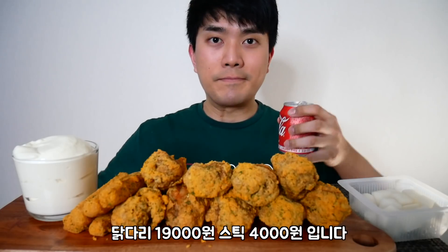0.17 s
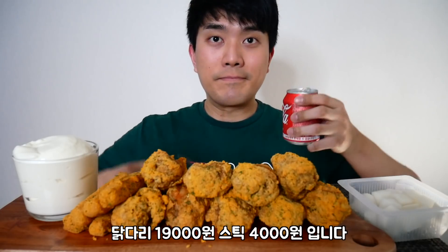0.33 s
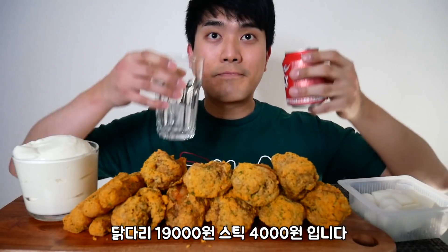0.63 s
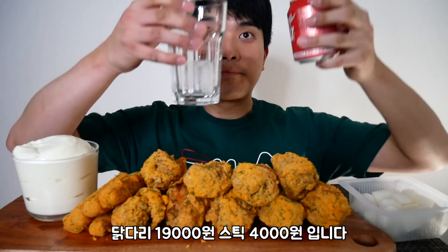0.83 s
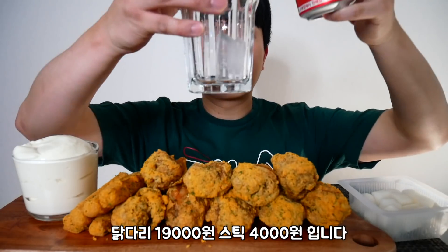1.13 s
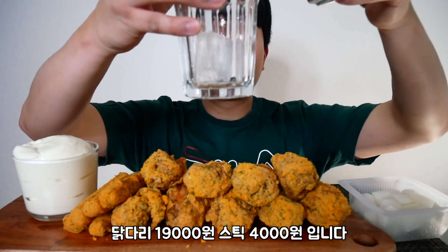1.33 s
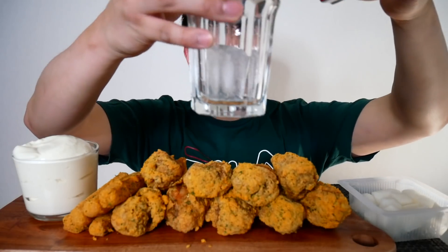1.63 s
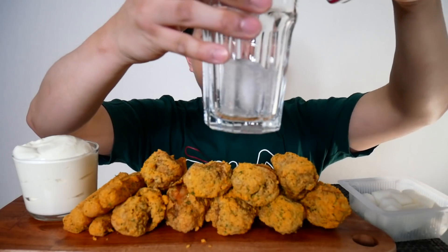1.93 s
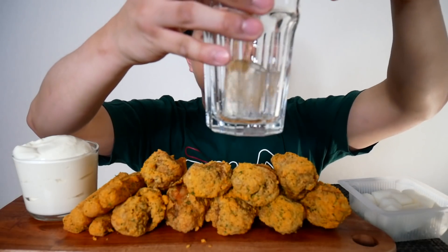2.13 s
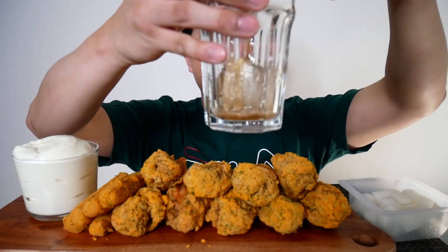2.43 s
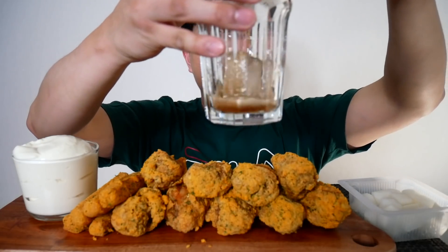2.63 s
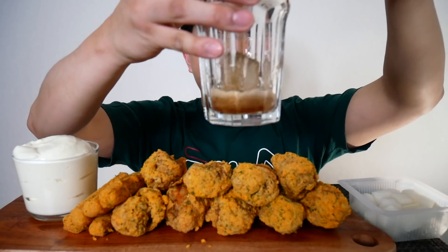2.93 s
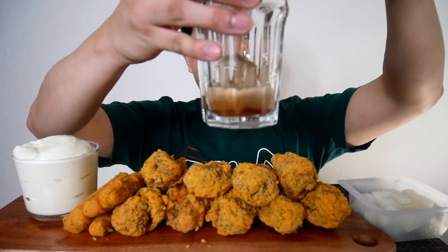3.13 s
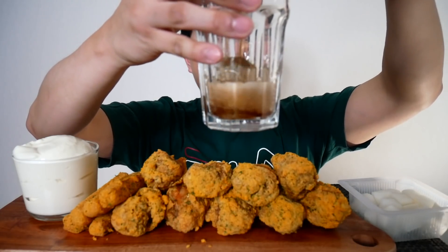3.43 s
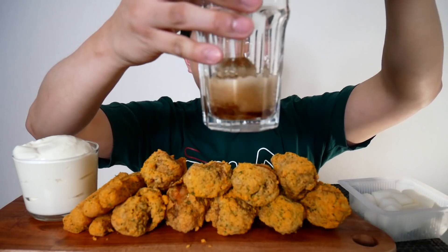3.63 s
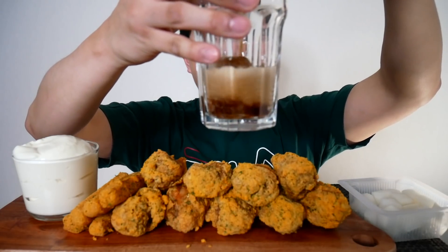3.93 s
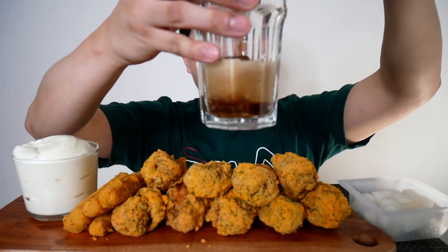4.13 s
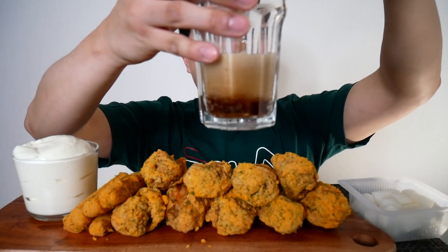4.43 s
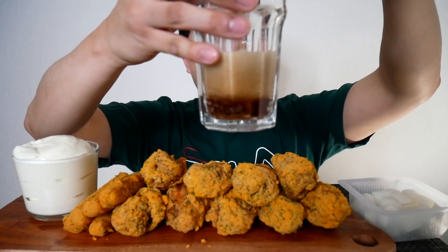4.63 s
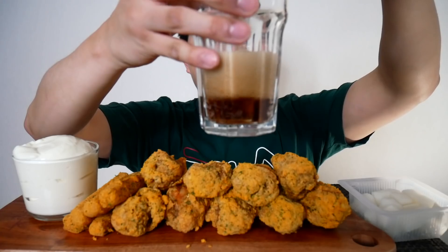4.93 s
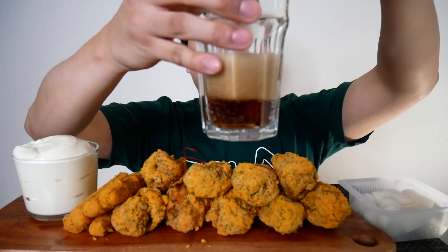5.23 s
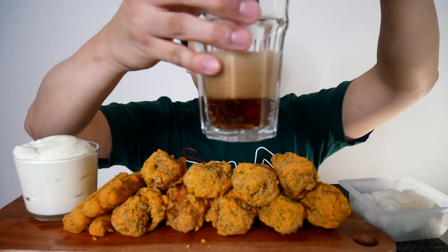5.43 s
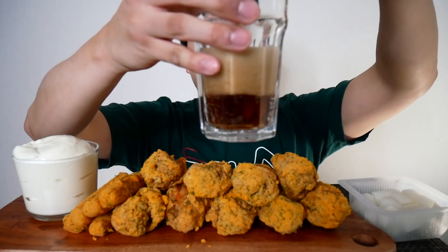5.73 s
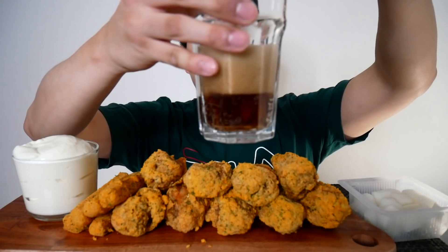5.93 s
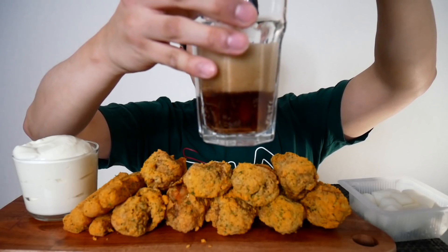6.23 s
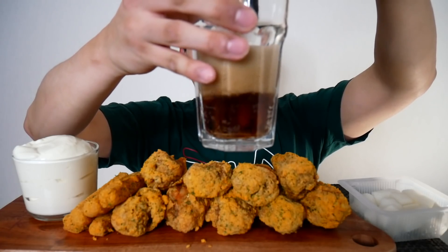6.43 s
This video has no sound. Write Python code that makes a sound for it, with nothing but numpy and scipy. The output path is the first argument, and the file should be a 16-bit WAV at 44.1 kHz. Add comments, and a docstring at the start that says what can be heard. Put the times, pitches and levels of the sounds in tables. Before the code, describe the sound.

Close, dry view of a soft drink poured over ice: faint tinks, sudden bright ice cracks, crackling fizz, then thick hollow bubbling as the glass fills.

```python
"""Soda poured over ice

In a quiet room, ice cubes clink faintly in a tall glass, a sleeve brushes past and a can wall gives.
Soda is then poured over the ice: fizz and splash are shaped noise, cracks are bright splinters of noise,
bubbles pop as short sines in the air column, whose pitch mostly climbs as the glass fills, and air pockets
gurgle as rising sines. Knocks also make the filled glass hum, and a short room echo follows the hits."""
import sys
import numpy as np
from scipy import signal
from scipy.fft import rfft, irfft, next_fast_len
from scipy.io import wavfile

SR = 44100
rng = np.random.default_rng(int(sys.argv[2]) if len(sys.argv) > 2 else 0)


def int16_out(signal):
    """Quantize to a 16-bit WAV file."""
    q = np.round(np.clip(np.atleast_2d(signal).T, -1, 1) * 32767)
    wavfile.write(sys.argv[1], SR, q.astype(np.int16))


N = 290178   # length [samples]
POUR_START_S = 2.085
BUBBLING_MEAN_DB = -46   # middle level from which the bubbling swings


def amp(db):
    """Decibels to gain."""
    return 10 ** (np.asarray(db) / 20)


def unit(x):
    """Scale to rms 1."""
    return x / np.sqrt(np.mean(x ** 2) + 1e-20)


def in_time(rows):
    """Read a (time, value) table as a curve with one value per sample."""
    s, value = np.transpose(rows)
    return np.interp(np.arange(N) / SR, s, value)


def drift(rate_hz):
    """Slow random wandering of spread 1: smoothed noise, made at every 40th sample."""
    r = np.exp(-80 * np.pi * rate_hz / SR)
    noise = rng.standard_normal(N // 40 + 2002)
    slow = signal.lfilter([1], [1, -2 * r, r * r], noise)[2000:]   # skip the filter's start
    return np.interp(np.arange(N) / 40, np.arange(len(slow)), unit(slow))


def ring(clicks, hz, t60):
    """A resonance: a unit click starts a sine of height 1 that falls by 60 dB in t60 seconds."""
    r, w = amp(-60 / (t60 * SR)), 2 * np.pi * hz / SR
    return signal.lfilter([0, np.sin(w)], [1, -2 * r * np.cos(w), r * r], clicks + 1e-18)


def train(times, gains):
    """Clicks of the given sizes at the given times."""
    out = np.zeros(N)
    np.add.at(out, np.round(np.asarray(times) * SR).astype(int), gains)
    return out


def add(out, s, piece):
    """Mix a short sound in at time s."""
    i = round(s * SR)
    out[i:i + len(piece)] += piece[:N - i]


def band(x, low_hz, high_hz):
    """Butterworth band-pass."""
    edges = [low_hz, min(high_hz, .45 * SR)]
    return signal.sosfilt(signal.butter(2, edges, "band", fs=SR, output="sos"), x)


def coloured(source, spectrum, patchy_db, flicker_hz):
    """Third-octave bands of two sources in turn, each with its own level and flicker; rms 1."""
    hz, level_db = np.transpose(spectrum)
    edges = hz[0] * 2 ** np.arange(0, np.log2(hz[-1] / hz[0]) + 1 / 3, 1 / 3)
    out, together = 0, drift(flicker_hz / 4)   # a slower flicker shared by all bands
    for k, (low, high) in enumerate(zip(edges, edges[1:])):
        mean_db = np.interp(np.log(low * high) / 2, np.log(hz), level_db)
        flicker_db = patchy_db * (.8 * together + drift(flicker_hz))
        out = out + band(source[k % 2], low, high) * amp(mean_db + flicker_db)
    return unit(out)


def grains(per_s, spread_db):
    """Random clicks of very uneven size, two unrelated rows; rms 1."""
    sizes = amp(spread_db * np.minimum(rng.exponential(1, (2, N)), 5)) * rng.choice([-1, 1], (2, N))
    return unit(sizes * (rng.random((2, N)) < per_s / SR))


# bubbling in the glass, as level of the air column: (time [s], level [dB])
BUBBLING = [(2.12, -88), (2.18, -48.5), (2.37, -67), (2.52, -56.5), (2.75, -59), (2.9, -58), (3.06, -58),
            (3.2, -57.5), (3.42, -64), (3.46, -51.5), (3.85, -47), (4.14, -37.5), (4.35, -42), (4.6, -47),
            (4.95, -43.5), (5.12, -35), (5.39, -40), (5.53, -41.5), (6.58, -43.5)]


def small_events(count):
    """Random moments through the pour, with the bubbling level at each and two chance values."""
    when = rng.random(count)
    loud, tune = rng.standard_normal((2, count))
    s = POUR_START_S + when * (N / SR - POUR_START_S - 1 / SR)
    return s, np.interp(s, *np.transpose(BUBBLING)), loud, tune


# colour of the room tone: (pitch [Hz], relative level [dB per Hz])
HUSH = [(13, -47), (22, 9), (60, 6), (170, 5.5), (590, -4.5), (757, 1.5), (1080, -4.5), (1740, 4),
        (2110, -22), (2350, -4.5), (8870, -7), (15000, -13.5), (16300, -28)]
# loudness of the room tone: (time [s], level [dB])
HUSH_LEVEL = [(0.0, -69), (0.38, -70.5), (0.69, -69.5), (1.87, -73.5), (2.03, -73), (2.1, -71)]


def room_tone():
    """The quiet room: coloured noise that flickers slightly."""
    hush = coloured(rng.standard_normal((2, N)), HUSH, patchy_db=.5, flicker_hz=6)
    return amp(in_time(HUSH_LEVEL)) * hush


# cubes touch the dry glass: (time [s], touch level [dB], air column level [dB],
# pitch that the wall rings nearest to [Hz], tink level of the top modes [dB])
CLINKS = [(0.089, -43.5, -63, 2010, -79), (0.224, -37, -61, 1690, -63), (0.334, -50, -87, 2000, -83),
          (0.725, -52, -88, 1750, -75), (0.836, -39.5, -58, 1660, -74), (0.867, -38, -54.5, 1710, -67),
          (1.145, -39, -45.5, 2960, -85), (1.153, -35.5, -49, 1730, -82), (1.364, -29.5, -53.5, 3140, -63),
          (1.638, -31, -47.5, 2320, -84), (1.847, -46, -71, 1800, -82), (1.929, -41.5, -52, 2900, -63),
          (2.011, -40.5, -67, 1750, -71)]
# modes of the glass: (pitch [Hz], relative level [dB], t60 [s],
# group: 0 air column, 1-4 wall modes from low to high)
GLASS = [(690, 0, .03, 0), (800, 2, .09, 0), (1563, -3, .05, 1), (1700, -2, .04, 1), (1803, 0, .07, 1),
         (1870, 0, .06, 1), (2363, 5, .07, 2), (2912, 5, .07, 3), (3230, -2, .04, 3), (5100, 0, .03, 4),
         (5950, 6, .04, 4)]
RATTLE_DB, WALL_DB = -10, -18.5   # relative to the touch level
WALL_FALL_DB_PER_OCTAVE = 24   # wall modes ring less away from the touch's pitch


def clinks():
    """Each touch is a dull rattle of ice and strikes the air column and the wall modes near its pitch."""
    s, touch_db, column_db, pitch, tink_db = np.transpose(CLINKS)
    touches = train(s, amp(touch_db + RATTLE_DB))
    dying = signal.lfilter([1], [1, -np.exp(-1 / (0.012 * SR))], touches)   # fades over 12 ms
    out = band(dying * rng.standard_normal(N), low_hz=650, high_hz=2830)
    for hz, level_db, t60, group in GLASS:
        wall_db = touch_db + WALL_DB - WALL_FALL_DB_PER_OCTAVE * np.abs(np.log2(pitch / hz))
        strike_db = [column_db, wall_db, wall_db, wall_db, tink_db][group]
        chance_db = rng.normal(0, 2, len(s))
        out += ring(train(s, amp(strike_db + level_db + chance_db)), hz, t60)
    return out


# a sleeve brushes past: (time [s], level [dB])
RUSTLE = [(.4, -84), (.5, -79), (.8, -86), (.95, -67.5), (1.05, -86), (1.45, -74), (1.7, -78.5)]


def rustle():
    """Brushing cloth: low-pitched noise with a fast, slight flutter."""
    noise = unit(band(rng.standard_normal(N), low_hz=262, high_hz=520))
    return amp(in_time(RUSTLE) + 0.96 * drift(26)) * noise


# the can wall gives under the fingers: (time [s], level before the modes' own levels [dB])
CAN_FLEX = [(0.522, -43)]
# modes of the can wall: (pitch [Hz], relative level [dB], t60 [s])
CAN = [(1100, -30, .05), (1235, -2, 0.15), (1290, 8, 0.16), (1346, 3, 0.19), (1610, 0, 0.089),
       (1810, -6, .07), (2630, -8, 0.1)]


def can():
    """A click sets the modes of the thin wall ringing briefly."""
    s, flex_db = np.transpose(CAN_FLEX)
    return sum(ring(train(s, amp(flex_db + level_db - 14.0)), hz, t60) for hz, level_db, t60 in CAN)


# colour of the fizz: (pitch [Hz], relative level [dB per Hz])
FIZZ = [(1000, -10), (1700, -4.5), (2320, 0.5), (2730, 3), (3110, 2), (5240, 3), (7360, 2.5), (10400, -1.5),
        (15100, -11), (16300, -7.5)]
# glass resonances in the fizz: (pitch [Hz], width [Hz], lift [dB])
FIZZ_PEAKS = [(3050, 130, 6), (3550, 300, 3), (4620, 150, 4), (6800, 2500, 2)]
# first drops, then foam building up: (time [s], level [dB])
FIZZ_LEVEL = [(2.085, -48.5), (2.122, -70), (2.128, -51), (2.3, -46.5), (2.5, -39), (2.64, -39.5),
              (2.76, -41.5), (3.3, -40), (3.5, -39.5), (4.1, -36.5), (4.35, -38.5), (6.58, -38)]
THIN_FIZZ_HZ, THIN_FIZZ_DB = 5500, -8.5   # the first fizz is thin below this pitch
FIZZ_FULL_S = 2.63   # the foam has formed


def fizz():
    """Countless tiny bubbles hiss: coloured noise and clicks, plus single bubbles bursting."""
    level_db = in_time(FIZZ_LEVEL)
    source = rng.standard_normal((2, N)) + .5 * grains(4000, spread_db=3)
    hiss = coloured(source, FIZZ, patchy_db=.7, flicker_hz=16)
    for hz, width_hz, lift_db in FIZZ_PEAKS:
        peak = signal.lfilter(*signal.iirpeak(hz, hz / width_hz, fs=SR), hiss)
        hiss = hiss + (amp(lift_db) - 1) * peak
    hiss = unit(hiss)
    full = amp(THIN_FIZZ_DB * np.clip((FIZZ_FULL_S - np.arange(N) / SR) / 0.07, 0, 1))
    hiss = full * hiss + (1 - full) * band(hiss, THIN_FIZZ_HZ, high_hz=18900)
    return amp(level_db) * hiss + amp(level_db - 9) * crackle(300)


def crackle(per_s):
    """Small foam bubbles burst singly, each ringing briefly at one of 14 high pitches; rms 1."""
    clicks, dealt = grains(per_s, spread_db=3)[0], rng.integers(0, 14, N)
    pitches = np.geomspace(3000, 13000, num=14)
    rings = sum(ring(clicks * (dealt == k), hz, 33.0 / hz) for k, hz in enumerate(pitches))
    return unit(band(rings, low_hz=2500, high_hz=15600))


SPLASH_DB, SPLASH_SHARE = -60, 0.59   # level at mean bubbling as the pour starts; share of the swing
SPLASH_GROWS_DB_PER_S = 3.5


def splash(poured_s, swing_db):
    """The stream splashes: noise and very uneven clicks in a middle band, growing through the pour."""
    level_db = SPLASH_DB + SPLASH_SHARE * swing_db + SPLASH_GROWS_DB_PER_S * poured_s
    source = rng.standard_normal(N) + 0.59 * grains(900, spread_db=11.0)[0]
    return amp(level_db) * unit(band(source, low_hz=980, high_hz=2500))


# pitch of the air column as the glass fills: (time [s], pitch [Hz])
COLUMN_PITCH = [(2.1, 730), (3.0, 796), (4.3, 840), (5.1, 980), (6.58, 953)]


def drumming():
    """Middling bubbles drum the air column: uneven clicks and noise through two resonances."""
    source = grains(400, spread_db=6.0)[0] + 0.63 * rng.standard_normal(N)
    hz = in_time(COLUMN_PITCH)
    column = air_column(air_column(source, hz, width_hz=200), hz, width_hz=600)
    return amp(in_time(BUBBLING)) * column


def air_column(source, hz, width_hz):
    """A resonance that follows the given pitch, stepped in short blocks; rms 1."""
    out, state, r = np.zeros(N), np.zeros(2), np.exp(-np.pi * width_hz / SR)
    for i in range(0, N, 256):
        a = [1, -2 * r * np.cos(2 * np.pi * hz[i] / SR), r * r]
        out[i:i + 256], state = signal.lfilter([1, 0, -1], a, source[i:i + 256], zi=state)
    return unit(out)


# colour of the gurgle: (pitch [Hz], relative level [dB per Hz])
GURGLE = [(15, -59), (25, -50), (49, -2.5), (102, -3.5), (198, 3), (261, -9), (339, 4), (389, -30),
          (500, 12), (650, -30.5), (1100, -120)]
GURGLE_DB, GURGLE_SHARE = -57.5, 0.12   # level at mean bubbling; share of the swing


def gurgle(poured_s, swing_db):
    """The stream gurgles low down: flickering coloured noise that fades in as the pour starts."""
    noise = coloured(rng.standard_normal((2, N)), GURGLE, patchy_db=1.2, flicker_hz=14)
    return np.clip(poured_s / 0.082, 0, 1) * amp(GURGLE_DB + GURGLE_SHARE * swing_db) * noise


def pour():
    """The steady sounds of the pour; splash and gurgle swing with the bubbling."""
    poured_s = np.arange(N) / SR - POUR_START_S
    swing_db = in_time(BUBBLING) - BUBBLING_MEAN_DB
    sounds = fizz() + splash(poured_s, swing_db) + drumming() + gurgle(poured_s, swing_db)
    return (poured_s > 0) * sounds


# ice cracks and bubbles bursting at the surface: (time [s], level [dB], pitch [Hz])
SNAPS = [(2.0855, -45, 6960), (2.126, -43, 5000), (2.1514, -30, 9250), (2.177, -27.5, 8000),
         (2.1798, -25, 10700), (2.2108, -27, 13300), (2.245, -31.5, 10000), (2.31, -27, 6070),
         (2.328, -26.5, 9400), (2.3339, -20, 6400), (2.35, -27, 5000), (2.366, -32.5, 2940),
         (2.372, -17, 9800), (2.4546, -25.5, 7650), (2.4573, -25, 12000), (2.503, -31, 1970),
         (2.5818, -19, 7200), (2.581, -19, 1550), (2.5962, -3, 5500), (2.599, -6, 2900),
         (2.6028, -22, 5200), (2.6478, -22, 1860), (2.659, 0.5, 1990), (2.6595, 1, 3030),
         (2.6765, -26, 1840), (2.6818, -21, 2550), (2.8324, -20, 7160), (2.8392, -24, 3300),
         (2.8451, -21.5, 9100), (2.8529, -21, 1950), (2.8945, -26, 3640), (2.8996, -8.5, 2120),
         (2.9, -15, 6700), (2.9073, -22, 3000), (2.9215, -10, 2400), (2.9216, -18, 6840),
         (2.9266, -16, 7560), (3.0507, -23, 3100), (3.057, -27, 2500), (3.274, -19, 3970),
         (3.4561, -22.5, 4000), (3.5086, -16.5, 4860), (3.509, -13.5, 8800), (3.5466, -28, 10500),
         (3.5957, -25, 12700), (3.6003, -22, 7900), (3.661, -16.5, 3940), (3.6894, -20, 4400),
         (3.7011, -18, 10300), (3.7234, -13, 9050), (3.7311, -14, 11400), (3.7822, -18.5, 3650),
         (3.7888, -11, 6740), (3.8141, -26, 2190), (3.8206, -13, 3770), (3.8337, -15.5, 6700),
         (3.8716, -27, 3500), (3.884, -20.5, 10200), (3.9009, -23, 3730), (3.9221, -26, 3470),
         (3.9281, -19, 11200), (3.948, -20, 3720), (3.9663, -14, 9000), (3.9712, -20, 5900),
         (3.9737, -20, 3470), (3.9855, -15, 5700), (3.989, -19, 11000), (3.998, -9, 4130),
         (4.0064, -13.5, 3440), (4.0082, -13.5, 9400), (4.0132, -19.5, 11000), (4.063, -8.5, 2900),
         (4.0645, -10, 8060), (4.09, -15, 3860), (4.0989, -21, 10800), (4.1106, -8, 3650),
         (4.116, -18, 3170), (4.141, -20, 3300), (4.159, -11.5, 3560), (4.1615, -14.5, 8700),
         (4.181, -6.5, 3550), (4.2028, -20.5, 3150), (4.2205, -20, 3800), (4.2312, -21, 3630),
         (4.2564, -19.5, 2310), (4.2926, -17.5, 3950), (4.3378, -20.5, 4000), (4.432, -20, 9900),
         (4.4519, -23, 3830), (4.4948, -24, 3400), (4.7255, -14, 7700), (4.7354, -20, 8850),
         (4.7401, -18, 3600), (4.7684, -15.5, 2590), (4.8249, -21, 8800), (4.8352, -19.5, 14900),
         (4.974, -14.5, 2070), (5.0005, -13.5, 2170), (5.0172, -16, 8600), (5.0243, -22, 4200),
         (5.052, -20, 2500), (5.0583, -18, 8040), (5.0766, -17.5, 4300), (5.0872, -21, 4540),
         (5.0953, -19, 3040), (5.1017, -14, 2340), (5.1726, -13, 2260), (5.1993, -23, 3990),
         (5.2131, -25, 3180), (5.3727, -19.5, 7300), (5.4395, -23, 2360), (5.5646, -24, 4470),
         (5.6788, -29, 2260), (5.7534, -23, 3070), (6.028, -20.5, 3300), (6.1179, -19.5, 3220),
         (6.2602, -16.5, 6300), (6.2798, -19, 2700), (6.392, -30, 6840)]
SNAP_RISE_S, SPLINTER_S = 0.0001, .0007   # how fast a splinter of noise rises and fades
SNAP_CYCLES = 2.1   # ring at 3.5 kHz and -23 dB
CYCLES_BY_PITCH, BLUNT_DB_PER_DB = 1, 0.28   # more cycles when high, fewer when loud
SMALL_SNAP_DB, SMALL_SNAP_SPREAD_DB = -31.5, 2   # at mean bubbling
SMALL_SNAP_SHARE = 1   # share of the bubbling's swing


def snaps():
    """A splinter of bright noise plus a damped resonance; wall modes ring after, damped by the drink."""
    out, t = np.zeros(N), np.arange(SR // 50) / SR
    s, bubbling_db, loud, tune = small_events(count=70)
    small_db = SMALL_SNAP_DB + SMALL_SNAP_SHARE * (bubbling_db - BUBBLING_MEAN_DB)
    small_db = small_db + SMALL_SNAP_SPREAD_DB * loud
    small_hz = np.clip(3800 * 2 ** (0.58 * tune), 1500, 12000)
    events = [*SNAPS, *zip(s, small_db, small_hz)]
    # a quick fade with a faint longer tail
    shape = (np.exp(-t / SPLINTER_S) + 0.078 * np.exp(-t / 0.011)) * (1 - np.exp(-t / SNAP_RISE_S))
    for s, level_db, hz in events:
        splinter = rng.standard_normal(len(t)) * shape
        cycles = SNAP_CYCLES * (hz / 3500) ** CYCLES_BY_PITCH * amp(-BLUNT_DB_PER_DB * (level_db + 23))
        tone = ring(splinter, hz, 2.98 * cycles / hz)
        burst = tone / np.abs(tone).max() + .8 * splinter / np.abs(splinter).max()
        burst = band(band(burst, 0.61 * hz, high_hz=13300), 0.41 * hz, high_hz=19000)
        add(out, s, amp(level_db) * burst / np.abs(burst).max())
    s, level_db, pitch = np.transpose(events)
    for hz, _, t60, _ in GLASS[4:]:   # the wall modes from 1803 Hz up
        # less away from the snap's pitch, and less as the pour goes on
        near_db = -16.0 * np.abs(np.log2(pitch / hz)) - 4.9 * (s - POUR_START_S)
        chance_db = rng.normal(0, 3.6, len(s))
        out += ring(train(s, amp(level_db - 17 + near_db + chance_db)), hz, t60)
    return out


# air pockets closing in the stream: (time [s], peak level [dB], pitch at mid-life [Hz])
GLUGS = [(2.176, -47, 520), (2.214, -45, 95), (2.24, -44, 119), (2.265, -43.5, 164), (2.345, -49, 190),
         (2.42, -46, 510), (2.55, -50, 274), (2.58, -43, 480), (3.8702, -40, 266), (4.058, -37.5, 261),
         (4.1146, -39, 292), (4.1985, -41, 280), (4.227, -39, 259), (4.2971, -37, 282), (4.3512, -41, 250),
         (4.4687, -34, 258), (4.5194, -40, 265), (4.6607, -38, 276), (4.7208, -43, 274), (4.8055, -38, 258),
         (5.1636, -60, 241), (5.6235, -46, 260), (5.6718, -54, 268), (5.8342, -44, 262), (5.9905, -38, 286),
         (6.0202, -32, 273), (6.05, -39, 265), (6.08, -37.5, 268), (6.2157, -42, 270), (6.2713, -38, 288),
         (6.3569, -44, 287)]
SMALL_GLUG_DB, SMALL_GLUG_SHARE = -54.5, .7   # level at mean bubbling; share of the swing
SMALL_GLUG_HZ, SMALL_GLUG_DETUNE = 266.6, 0.14   # pitch; its spread as a share
# pockets last longer while the bottom is bare
GLUG_LIFE_S, DRY_GLUG_LIFE_S, BOTTOM_COVERED_S = 0.019, 0.029, 3
GLUG_RISE_HZ_PER_S = 770   # at the pitch of the small ones; low pockets rise faster


def glugs():
    """A pocket swells and fades softly, rising in pitch as it shrinks; small ones rumble unevenly."""
    out = np.zeros(N)
    s, bubbling_db, loud, tune = small_events(count=320)
    small_db = SMALL_GLUG_DB + SMALL_GLUG_SHARE * (bubbling_db - BUBBLING_MEAN_DB) + 2.5 * loud
    small_hz = SMALL_GLUG_HZ * (1 + SMALL_GLUG_DETUNE * tune)
    for s, peak_db, hz in [*GLUGS, *zip(s, small_db, small_hz)]:
        life = GLUG_LIFE_S if s > BOTTOM_COVERED_S else DRY_GLUG_LIFE_S
        t = np.arange(round(life * SR)) / SR
        rise = GLUG_RISE_HZ_PER_S * (SMALL_GLUG_HZ / hz) ** 2
        turns = hz * t + rise * (t - life / 2) ** 2 / 2
        add(out, s, np.sin(2 * np.pi * turns) * amp(peak_db) * np.hanning(len(t)))
    return out


# knocks and big bubbles that set the air column going: (time [s], level [dB], pitch [Hz])
PLOPS = [(2.4826, -34.5, 747), (2.5102, -23.5, 786), (2.5982, -27, 800), (2.6599, -18, 767),
         (2.6735, -24.5, 741), (2.833, -16, 765), (2.8529, -22.5, 797), (2.8998, -3, 803),
         (2.922, -2.5, 767), (2.9556, -29, 816), (3.0588, -30.5, 730), (3.2943, -35.5, 823),
         (3.4507, -28, 785), (3.5098, -30.5, 913), (3.534, -32.5, 894), (3.5919, -31, 840),
         (3.6226, -31, 824), (3.6624, -27.5, 810), (3.7216, -29.5, 820), (3.789, -27.5, 860),
         (3.865, -29, 820), (3.9016, -28, 810), (3.9734, -25.5, 813), (4.0632, -19, 800),
         (4.1201, -19, 1010), (4.1584, -25, 830), (4.1809, -15, 840), (4.2202, -20, 850),
         (4.2313, -19, 970), (4.2564, -16.5, 830), (4.305, -21.5, 980), (4.3372, -18.5, 790),
         (4.4516, -22.5, 836), (4.663, -23.5, 830), (4.725, -16, 980), (4.7368, -19, 910),
         (4.8125, -20.5, 890), (4.903, -19.5, 1120), (4.917, -20.5, 980), (4.974, -11, 1080),
         (5.0008, -19.5, 980), (5.0172, -21, 1000), (5.028, -19, 1030), (5.052, -14, 910),
         (5.0763, -18, 980), (5.0869, -19, 895), (5.1017, -14, 1020), (5.122, -14, 990), (5.1502, -7, 950),
         (5.1725, -9, 1100), (5.1994, -13.5, 1070), (5.214, -19, 1070), (5.232, -18, 990),
         (5.2492, -11, 1000), (5.263, -10, 990), (5.2747, -10.5, 1000), (5.3068, -15, 1020),
         (5.319, -10.5, 910), (5.3326, -12.5, 1010), (5.35, -17, 920), (5.3706, -7, 980),
         (5.377, -10.5, 960), (5.3912, -13, 920), (5.439, -24.5, 920), (5.497, -18, 1040),
         (5.5503, -21, 980), (5.591, -15, 930), (5.629, -15.5, 920), (5.6765, -10, 756), (5.7205, -15, 980),
         (5.755, -14, 1060), (5.7848, -16, 880), (5.8394, -12.5, 890), (5.9611, -21, 1010),
         (5.9701, -17, 980), (5.9978, -6.5, 674), (6.009, -5.5, 950), (6.0269, -12, 925),
         (6.042, -11.5, 600), (6.223, -15.5, 820), (6.2476, -16.5, 1290), (6.2771, -11, 886),
         (6.361, -14.5, 644), (6.549, -21, 980)]
PLOP_T60_LEAST_S, PLOP_T60_S = 0.005, 0.032   # least ring time; extra at -25 dB as the pour starts
FOAM_DAMPS_S = 1.61   # into the pour, the foam has halved the extra ring time
LOUD_PLOP_SHORTER_DB_PER_DB = 0.04   # hard knocks die sooner
SMALL_PLOP_DB, SMALL_PLOP_SPREAD_DB = 10, 2   # over the bubbling level
SMALL_PLOP_DETUNE = 0.064   # spread as a share of the column's pitch


def plops():
    """A tap, then a few cycles of the air column with a faint longer hum; rising foam damps it."""
    out, t = np.zeros(N), np.arange(SR // 5) / SR
    s, bubbling_db, loud, tune = small_events(count=200)
    small_db = bubbling_db + SMALL_PLOP_DB + SMALL_PLOP_SPREAD_DB * loud
    small_hz = np.interp(s, *np.transpose(COLUMN_PITCH)) * (1 + SMALL_PLOP_DETUNE * tune)
    for s, level_db, hz in [*PLOPS, *zip(s, small_db, small_hz)]:
        foam = 1 + ((s - POUR_START_S) / FOAM_DAMPS_S) ** 4.3
        shorter = amp(-LOUD_PLOP_SHORTER_DB_PER_DB * (level_db + 25))
        t60 = PLOP_T60_LEAST_S + PLOP_T60_S / foam * shorter
        fading = amp(-60 * t / t60) + amp(-19 - 60 * t / (5 * t60))
        tap = .9 * np.exp(-t / .0001)
        add(out, s, amp(level_db) * (np.sin(2 * np.pi * hz * t) * fading + tap))
    return band(band(out, low_hz=520, high_hz=11100), low_hz=550, high_hz=13300)


DRINK_HZ, DRINK_T60_S = 271, 0.043
DRINK_DB, DRINK_GROWS_DB_PER_S = -38, 3.5   # under the knock as the pour starts; more as the glass fills
DRINK_FALL_DB_PER_OCTAVE = 16   # deep knocks move the drink more than high ones


def drink_hum():
    """Every big knock sets the low mode of the drink ringing."""
    s, knock_db, hz = np.transpose(PLOPS)
    high_db = DRINK_FALL_DB_PER_OCTAVE * np.log2(hz / 800)
    hum_db = knock_db + DRINK_DB + DRINK_GROWS_DB_PER_S * (s - POUR_START_S) - high_db
    return band(ring(train(s, amp(hum_db)), DRINK_HZ, DRINK_T60_S), low_hz=167, high_hz=615)


THUMP_DB, THUMP_S = -14, 0.00022   # level; fading time


def overload_thump():
    """A one-sided low thump from overload at the loudest crack: a click that fades without swinging back."""
    loudest_s = max(SNAPS, key=lambda snap: snap[1])[0]
    click = train([loudest_s], amp(THUMP_DB)) + 1e-18
    return signal.lfilter([1], [1, -np.exp(-1 / (THUMP_S * SR))], click)


ROOM_T60_S, ROOM_DB, WALL_CUT_HZ = 0.32, -25.5, 8700


def room(x):
    """Room echo: eight feedback delays, duller at each wall."""
    size = next_fast_len(N + SR)
    hz = np.arange(size // 2 + 1) * SR / size
    dull, echo = 1 / (1 + 1j * hz / WALL_CUT_HZ), 0
    for k, lag in enumerate(np.geomspace(.006, .029, num=8)):   # delays [s]
        loop = amp(-60 * lag / ROOM_T60_S) * dull * np.exp(-2j * np.pi * hz * lag)
        echo = echo + (-1) ** k * loop / (1 - loop)
    return irfft(rfft(x, size) * echo, size)[:N]


def scene():
    """Glass, can and drink close by, a little room echo on the hits, the room tone and one overload thump."""
    hits = clinks() + can() + snaps() + plops()
    hits = band(hits, low_hz=464, high_hz=20000)   # small bodies radiate no bass
    close = rustle() + hits + pour() + glugs() + drink_hum()
    return (room_tone() + close + overload_thump() + amp(ROOM_DB) * room(hits))[None]


def record(dry):
    """Peaks are clipped at full scale, then everything above 16.3 kHz is cut steeply."""
    return signal.sosfilt(signal.cheby2(20, 90, 16300, fs=SR, output="sos"), np.clip(dry, -1, 1))


dry = scene()
out = record(dry)
int16_out(out)
```